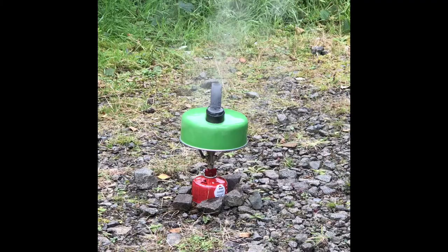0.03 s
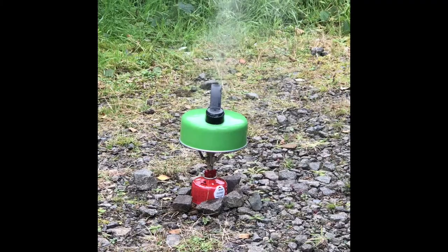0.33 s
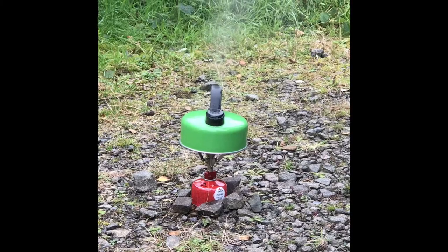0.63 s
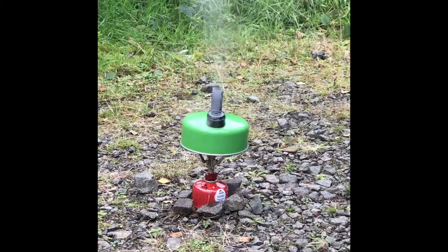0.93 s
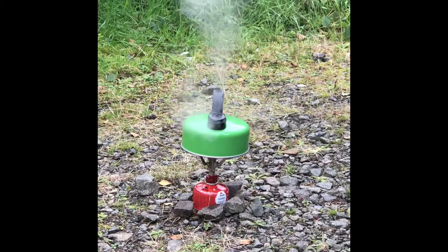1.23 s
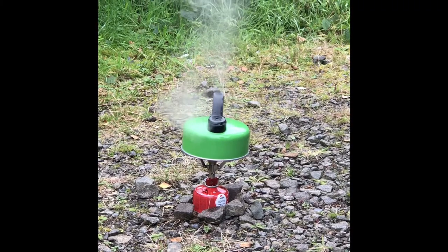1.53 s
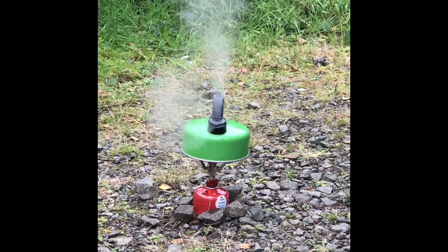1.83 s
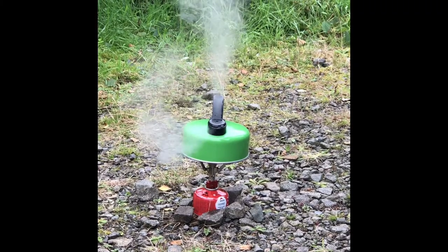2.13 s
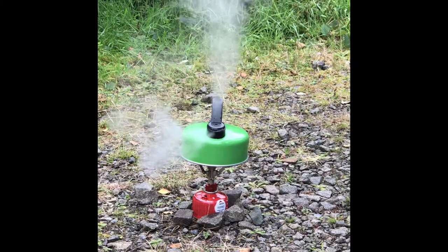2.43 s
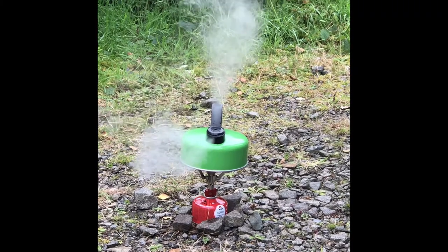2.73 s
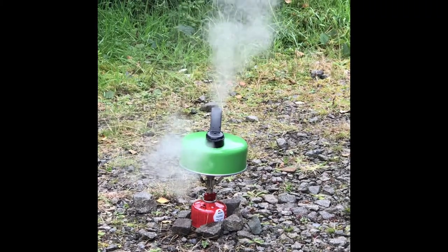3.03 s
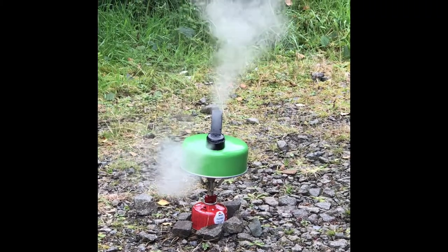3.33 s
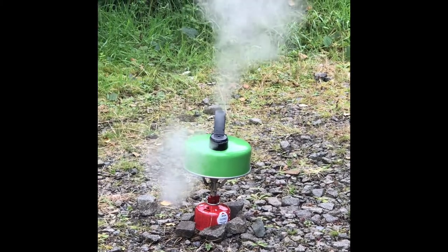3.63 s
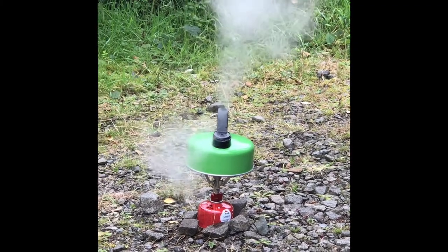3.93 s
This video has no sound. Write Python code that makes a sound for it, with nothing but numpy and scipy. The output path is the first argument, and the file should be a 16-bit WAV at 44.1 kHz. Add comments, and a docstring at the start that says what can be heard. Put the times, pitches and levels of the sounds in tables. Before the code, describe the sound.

A kettle whistles outdoors, high and continuous with a rough flutter, over hissing steam and the low roar of a gas burner. A foot shifts faintly on gravel, then steps down with a crunch and clicking stones.

```python
"""A camping kettle boils on a gas burner outdoors. From the start the flame roars over a low hum,
steam hisses from the spout and the kettle whistles near 4.8 kHz. The steam jet flutters, about 200
times a second at first and nearer 150 later, so the whistle swells and sharpens in rough little bursts.
A stone ticks early on; a foot shifts on the gravel just after one second and again around two.
Near three seconds it treads down: grains grind, the heel knocks and stones click together."""
import sys
import numpy as np
from scipy.fft import rfft, irfft, next_fast_len
from scipy.io import wavfile
from scipy.ndimage import uniform_filter1d, map_coordinates

SR = 44100
rng = np.random.default_rng(int(sys.argv[2]) if len(sys.argv) > 2 else 0)


def store_wav(level_fs):
    """Save 16-bit WAV to argv[1]."""
    pcm = np.round(np.clip(np.atleast_2d(level_fs), -1, 1) * 32767)
    wavfile.write(sys.argv[1], SR, pcm.T.astype(np.int16))


N = 176400


def amp(db):
    """Decibels to amplitude ratio."""
    return 10 ** (np.asarray(db) / 20)


def unit(x):
    """Normalisation to rms 1."""
    return x / np.sqrt(np.mean(np.abs(x) ** 2) + 1e-20)


def curves(rows):
    """Linear interpolation: one value per sample for each column after the time."""
    s, *cols = np.transpose(rows)
    return [np.interp(np.arange(N) / SR, s, c) for c in cols]


def wobble(rate):
    """Smooth random modulation: a spline through rate knots a second."""
    return map_coordinates(rng.standard_normal(int(N * rate / SR) + 4), [np.arange(N) * rate / SR])


def filtered(x, response):
    """Linear filtering: the spectrum of x times a frequency response."""
    m = next_fast_len(N + SR // 4)
    return irfft(rfft(x, m) * response(np.fft.rfftfreq(m, 1 / SR)), m)[:N]


def coloured(x, points):
    """Spectral shaping by (frequency_hz, relative_db) points, at rms 1."""
    f, db = np.transpose(points)
    return unit(filtered(x, lambda hz: amp(np.interp(np.log(hz + 1), np.log(f), db))))


def turning(hz):
    """Phase as the integral of frequency."""
    return 2 * np.pi * np.cumsum(hz) / SR


def ring(modes, t):
    """Free vibration: damped sines from (frequency_hz, level_db, t60_s) rows."""
    return sum(amp(db - 60 * t / t60) * np.sin(2 * np.pi * hz * t) for hz, db, t60 in modes)


def add(track, start_s, sound):
    """Superpose a sound on the track at start_s."""
    part = track[round(start_s * SR):][:len(sound)]
    part += sound[:len(part)]


# Spectrum of the flame noise: frequency_hz, relative_db
ROAR_SPECTRUM = [(20, -24), (32, -22), (45, 1.5), (110, -0.5), (300, 0), (420, -3.5), (520, -1), (650, -1),
                 (740, -5.5), (850, -1), (1050, -3.5), (1220, -8.5), (1450, -19), (2200, -10), (5000, -37)]
# Resonances of the burner: centre_hz, bandwidth_hz, relative_db
BURNER_MODES = [(63.7, 23, -9.5), (87.3, 14, -10.5), (162, 35, -9), (219, 13, -9.5), (298, 13, -7),
                (595, 24, -10.5), (888, 17, -11)]
def burner():
    """The flame radiates broadband noise; noise-driven resonances add a low drone."""
    def resonances(f):
        response = sum(amp(db) * 1j * f * width / (centre * centre - f * f + 1j * f * width)
                       for centre, width, db in BURNER_MODES)
        return response * (f > 30) * (f < 1300)

    roar_db, flicker_db, drone_db = -43, .7, -48.5
    drone = unit(filtered(rng.standard_normal(N), resonances))
    roar = coloured(rng.standard_normal(N), ROAR_SPECTRUM)
    return amp(roar_db + flicker_db * wobble(12)) * roar + amp(drone_db) * drone


def hum():
    """Random amplitude and frequency modulation make a low tone waver under the roar."""
    pitch_hz, waver_hz, level_db, flicker_db = 68.8, 5, -49.5, .5
    flicker = amp(flicker_db * wobble(13))
    phase = turning(pitch_hz + waver_hz * wobble(22))
    return amp(level_db) * unit(flicker * np.sin(phase))


# Spectrum of the steam jet: frequency_hz, relative_db
HISS_SPECTRUM = [(600, -16), (1500, -9), (1950, 1), (2350, -3), (2750, -11.5), (3050, 2.5), (3280, 1.5),
                 (3650, -5.5), (4300, -3.5), (5800, -10), (6300, -5.5), (7400, -13), (9000, -10.5),
                 (10000, -7.5), (10500, -26), (11500, -13.5), (13000, -21), (14200, -12.5), (15000, -22.5),
                 (16000, -27)]
# Spectrum of droplets bursting in the spout: frequency_hz, relative_db
SPIT_SPECTRUM = [(1500, -20), (3500, -12), (7000, 2), (12000, 3), (16000, -15)]
def steam():
    """Jet turbulence hisses at the spout; bursting droplets add faint, randomly timed impulses."""
    hiss_db, spit_db, spits_per_s = -49.5, -65.5, 250
    hiss = amp(hiss_db + .76 * wobble(7)) * coloured(rng.standard_normal(N), HISS_SPECTRUM)
    bursts = rng.random(N) < spits_per_s / SR
    drops = bursts * rng.standard_normal(N) * amp(3 * wobble(4.8))
    return hiss + amp(spit_db) * coloured(drops, SPIT_SPECTRUM)


# Centre pitch of the whistle: time_s, pitch_hz
WHISTLE_PITCH = [(.08, 4800), (.16, 4802), (.29, 4728), (.41, 4780), (.46, 4738), (.565, 4770), (.59, 4800),
                 (.85, 4805), (.93, 4772), (1.0, 4825), (1.08, 4778), (1.61, 4808), (1.74, 4762),
                 (2.15, 4750), (2.21, 4800), (2.33, 4748), (2.65, 4760), (2.8, 4715), (3.03, 4718),
                 (3.45, 4750), (4, 4745)]
# Level of the whistle: time_s, level_db
WHISTLE_LEVEL = [(.08, -36.5), (.147, -37), (.156, -32), (.21, -32.3), (.28, -35), (.565, -35.5),
                 (.585, -33.7), (.85, -33.3), (1.15, -34), (1.35, -35.2), (1.45, -34.2), (1.9, -34),
                 (2.55, -33.4), (2.61, -36.5), (2.65, -33.7), (2.83, -35.5), (3.06, -36), (3.12, -33.6),
                 (3.33, -35.5), (3.42, -34.6), (4, -36)]
# Flutter of the jet: time_s, rate_hz, depth_ratio
JET_FLUTTER = [(.08, 200, 1.6), (.148, 195, 1.6), (.154, 220, .35), (.21, 205, .55), (.3, 162, .9),
               (.565, 158, .95), (.58, 168, 1.3), (.85, 160, 1.1), (1.5, 154, 1.1), (2.1, 152, .95),
               (2.52, 155, .8), (2.85, 146, 1), (3.4, 144, 1.05), (3.75, 146, 1.25), (4, 138, 1.25)]
# Response of the whistle cavity: frequency_hz, relative_db
CAVITY_RESPONSE = [(3800, -40), (4400, -27), (4600, 2), (4800, 2), (4950, -5), (5120, 1), (5300, -8.5),
                   (5600, -16.5), (6500, -45)]
# Overtones of the whistle: harmonic_number, relative_db, roughness_rad
WHISTLE_HARMONICS = [(2, -21, 0.54), (3, -40, 1.7)]
def whistle():
    """Jet flutter modulates the tone's level and pitch together; turbulence excites the cavity."""
    swell_db, flicker_db, breath_db = 5.2, .7, -11
    bend_rad, jitter_rad, waver_hz = .6, .32, 14
    rate_scatter, depth_scatter = .135, .16
    pitch_hz, = curves(WHISTLE_PITCH)
    level_db, = curves(WHISTLE_LEVEL)
    rate_hz, depth = curves(JET_FLUTTER)
    cycle = np.exp(1j * turning(rate_hz * (1 + rate_scatter * wobble(170))))
    peaked_cycle = cycle + .13 * cycle ** 2  # short peaks, long troughs
    flutter = depth * (1 + depth_scatter * wobble(260)) * peaked_cycle
    swell = amp(swell_db * flutter.real + flicker_db * wobble(90))
    swell /= np.sqrt(np.abs(uniform_filter1d(swell ** 2, size=1700)))  # even power over about 40 ms
    phase = turning(pitch_hz + waver_hz * wobble(45))
    phase += bend_rad * flutter.imag + jitter_rad * wobble(350)
    breath = coloured(rng.standard_normal(N), CAVITY_RESPONSE)
    tone = unit(swell * np.sin(phase)) + amp(breath_db) * breath
    for harmonic, db, roughness_rad in WHISTLE_HARMONICS:
        tone += amp(db) * unit(swell * np.sin(round(harmonic) * phase + roughness_rad * wobble(550)))
    return amp(level_db) * unit(tone)


# Collisions between stones: start_s, peak_db, pitch_hz
STONE_IMPACTS = [(.238, -31, 7000), (1.917, -25, 3500), (1.928, -30, 9500), (1.976, -30, 4200),
                 (2.066, -28, 2900), (2.764, -23, 7200), (2.793, -24, 12500), (2.848, -21, 6300),
                 (2.876, -25, 3800), (2.925, -18, 3700), (2.982, -24, 8500), (2.999, -26, 8000),
                 (3.007, -12.5, 7300), (3.0105, -22, 10500), (3.0215, -22, 9500), (3.1535, -23, 9500)]
# Vibration modes of a stone: pitch_ratio, relative_db, t60_s
STONE_MODES = [(.58, -8, .004), (.83, -2, .0035), (1, 0, .0032), (1.35, -3, .003)]
def stones():
    """Each impact gives a crack of noise and excites quickly decaying modes in a small stone."""
    crack_db, crack_t60_s = -15, .0056
    out, age = np.zeros(N), np.arange(SR // 25) / SR
    for start_s, peak_db, pitch_hz in STONE_IMPACTS:
        tick = ring([(pitch_hz * ratio, db, t60_s) for ratio, db, t60_s in STONE_MODES], age)
        bright_noise = np.gradient(rng.standard_normal(len(age)))
        tick += amp(crack_db - 60 * age / crack_t60_s) * bright_noise
        add(out, start_s, amp(peak_db) * tick / np.abs(tick).max())
    return out


# Gaussian spurts of grinding under the sole: centre_s, sigma_s, level_db
SOLE_CRUNCHES = [(1.14, .03, -49), (1.93, .025, -48.5), (2.15, .12, -63), (2.76, 0.021, -44.5),
                 (2.877, 0.046, -48.5), (2.904, 0.0024, -34.5), (2.918, 0.0029, -37.5),
                 (2.925, 0.0044, -37.5), (2.937, 0.021, -43), (2.984, 0.0092, -48), (3.151, .008, -44.5)]
# Spectrum of grinding gravel: frequency_hz, relative_db
GRAVEL_SPECTRUM = [(200, -14), (800, 12), (1600, 9), (2700, 1.5), (3700, 7.5), (7000, 0.5), (10000, -0.5),
                   (13000, -3.5), (16000, -8)]
# Vibration modes of the ground: frequency_hz, relative_db, t60_s
GROUND_MODES = [(230, -16, .04), (420, -13, .025), (610, 0, .04), (810, -3, .042), (1020, -8, .03),
                (1400, -12, .025), (2500, -14, .01)]
def footstep():
    """Granular friction gives spurts of tiny clicks; the heel's impact rings the ground's modes."""
    grains_per_s = 9000
    heel_s, heel_gain_db, attack_s = 2.9239, -19.5, .0005
    t = np.arange(N) / SR
    grains = (rng.random(N) < grains_per_s / SR) * rng.standard_normal(N)
    pressure = sum(amp(db) * np.exp(-.5 * ((t - centre_s) / sigma_s) ** 2)
                   for centre_s, sigma_s, db in SOLE_CRUNCHES)
    out = pressure * coloured(grains, GRAVEL_SPECTRUM)
    age = t[:SR // 10]
    knock = ring(GROUND_MODES, age) * (1 - np.exp(-age / attack_s))
    add(out, heel_s, amp(heel_gain_db) * knock)
    return out


def scene():
    """Superposition: the sources add at one point in the open air."""
    return (burner() + hum() + steam() + whistle() + stones() + footstep())[None]


def record(dry):
    """A step gate starts the sound abruptly; an ideal low-pass filter limits its bandwidth."""
    start_s, cutoff_hz = .072, 15800
    gate = np.arange(N) / SR > start_s
    return filtered(dry[0] * gate, lambda hz: hz < cutoff_hz)[None]


dry = scene()
out = record(dry)
store_wav(out)
```